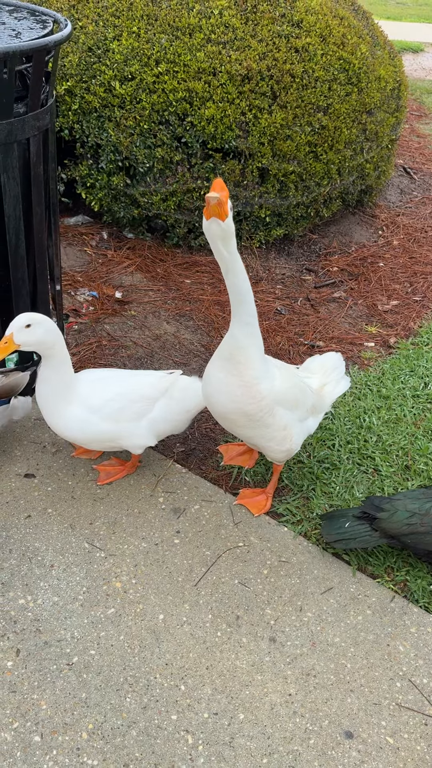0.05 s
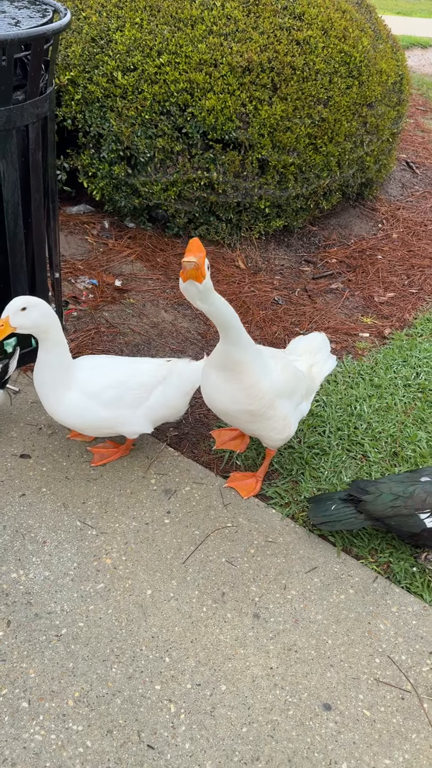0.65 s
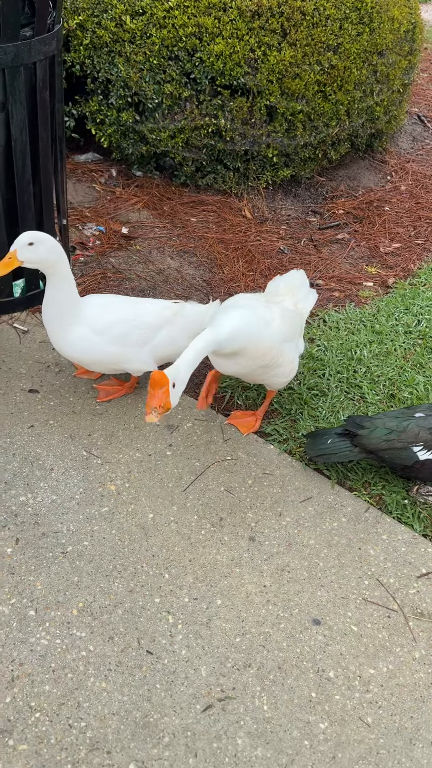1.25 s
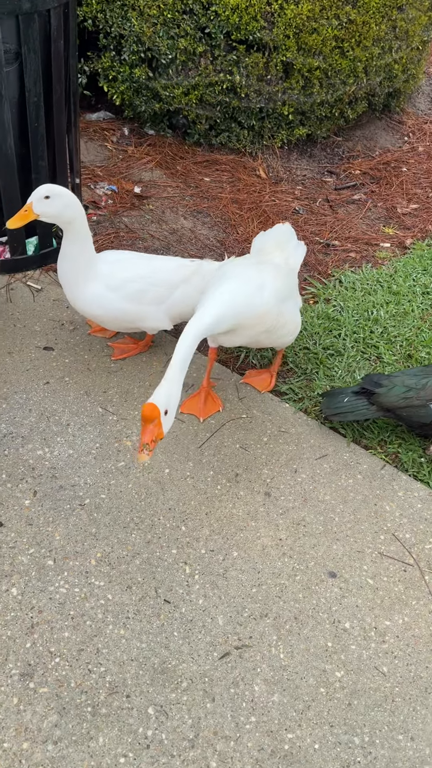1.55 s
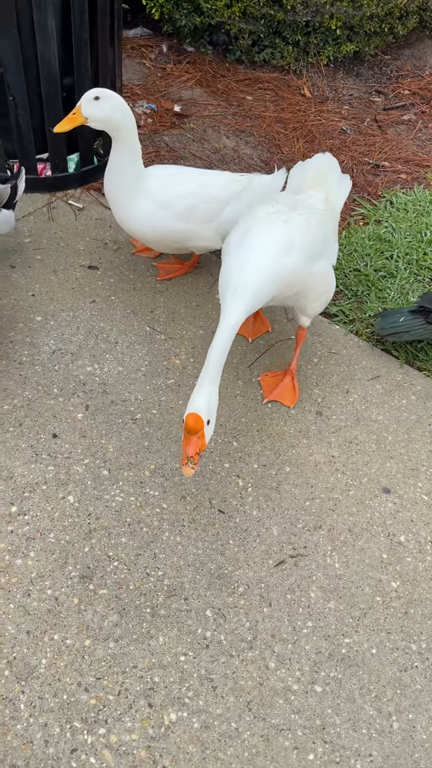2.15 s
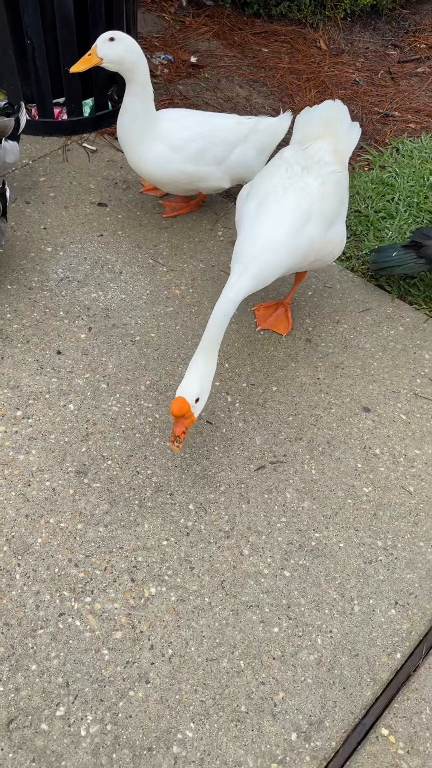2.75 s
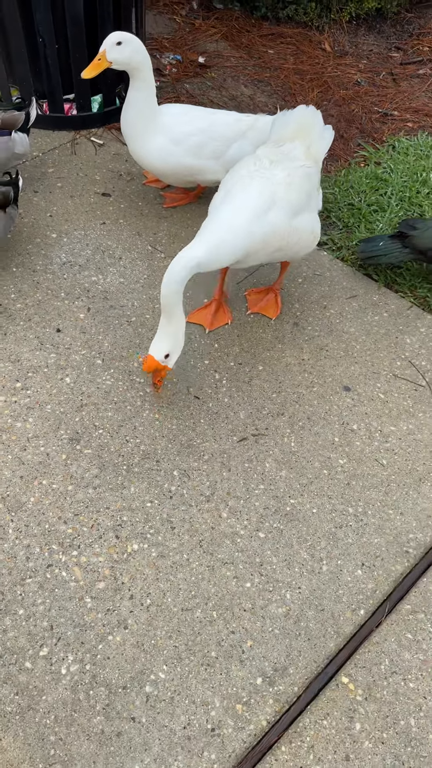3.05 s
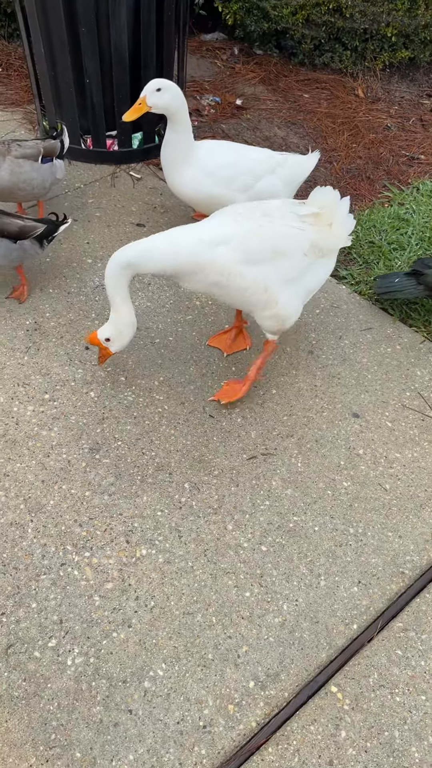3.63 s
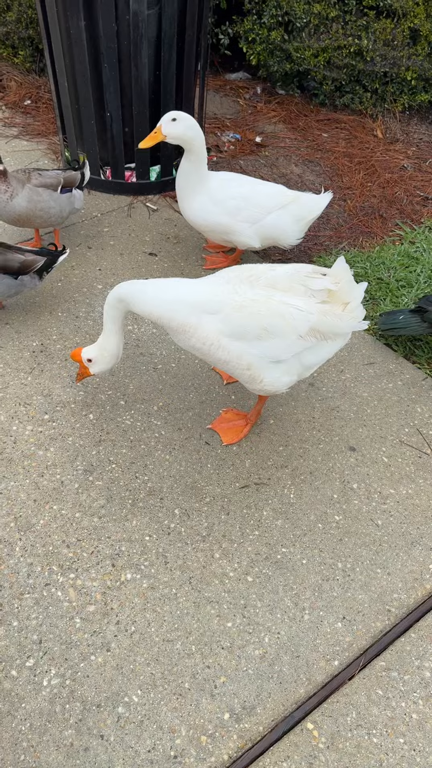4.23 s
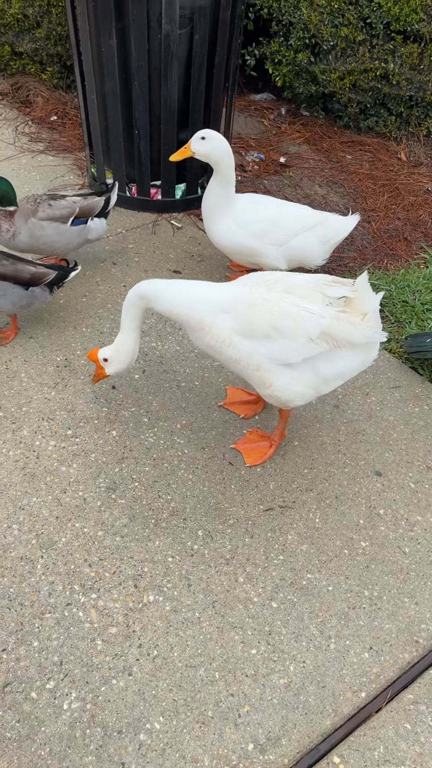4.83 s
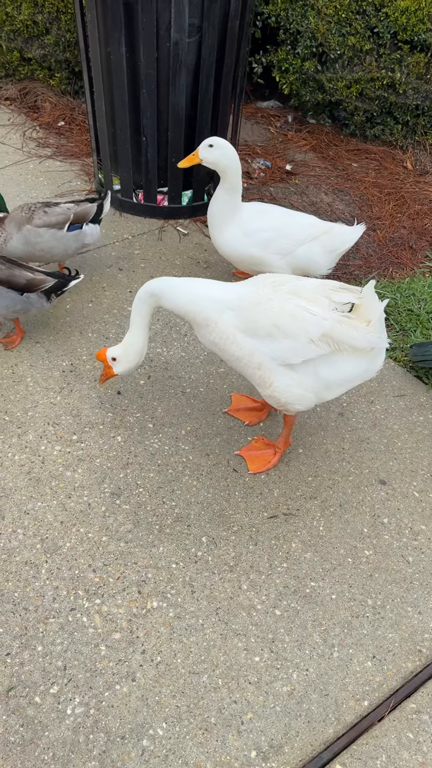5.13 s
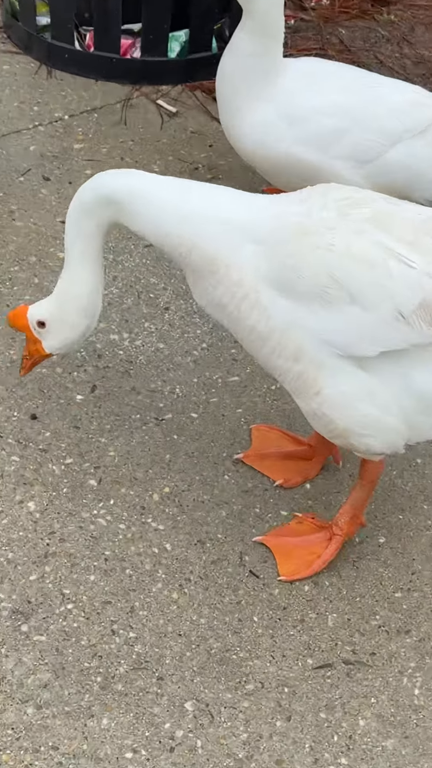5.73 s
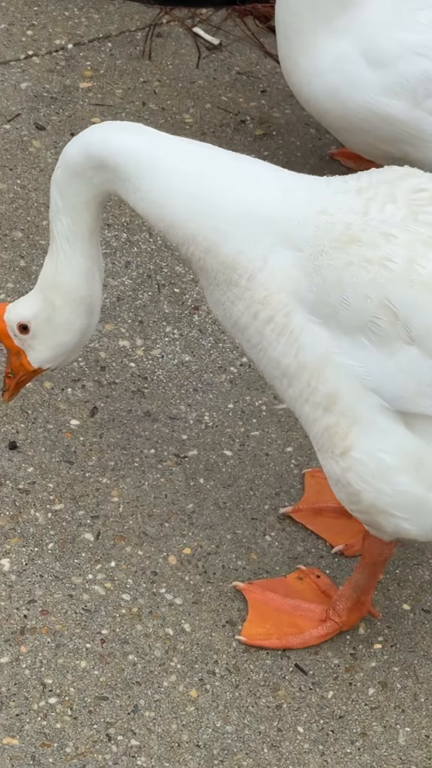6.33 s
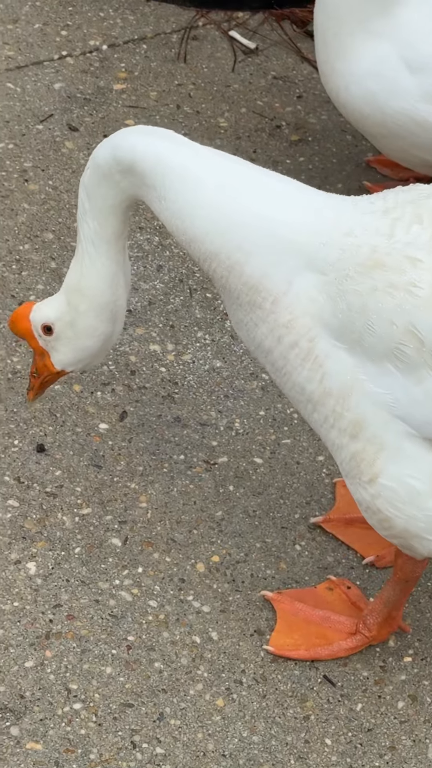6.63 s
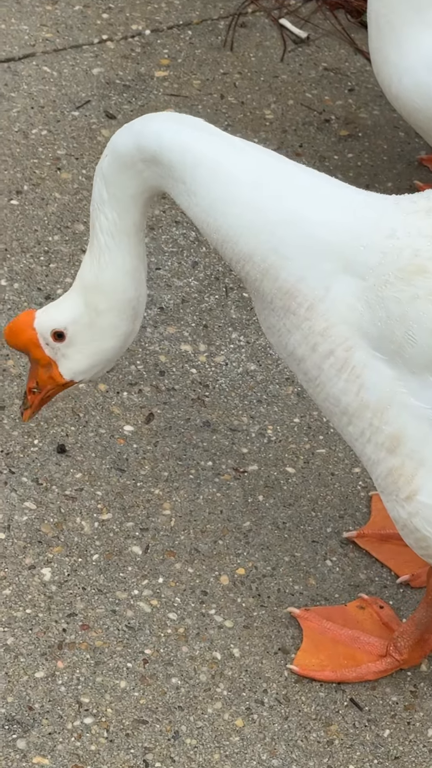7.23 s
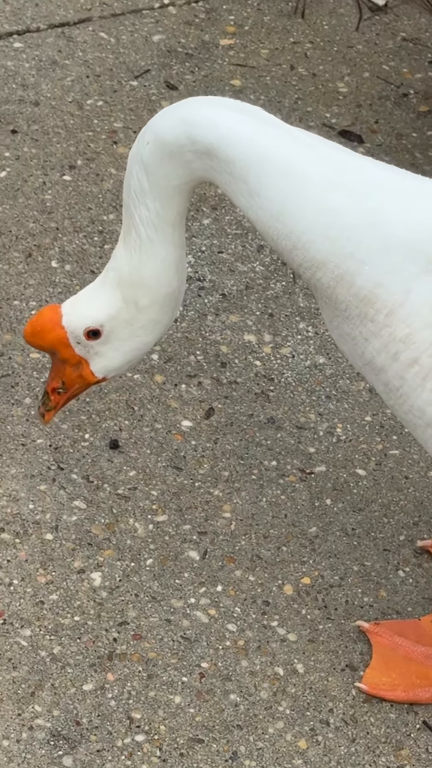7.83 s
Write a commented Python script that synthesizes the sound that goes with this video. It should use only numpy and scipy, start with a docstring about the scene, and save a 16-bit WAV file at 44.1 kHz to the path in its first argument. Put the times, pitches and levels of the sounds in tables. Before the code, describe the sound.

Close by, ducks give short, rattling clucks and soft quacks, about two a second, mostly a little to the left. A goose's bill ticks and scrapes lightly on concrete while gusts rumble and pop on the microphone. Later the calls thin out and the gusts ease. A low rumble swells near the end and a distant bird whistles once, over faint outdoor traffic and hiss.

```python
"""Ducks cluck close by, beside a goose feeding on a pavement.
Each cluck is a short rattle of slow pulses ringing through throat and bill, doubled by its echo off
the concrete. Bills scrape and tick on the ground, and wind rumbles and pops on the microphone.
Far traffic and a fine hiss lie behind; near the end a low drone swells and a distant bird whistles."""
import sys
import numpy as np
from scipy import signal
from scipy.fft import rfft, irfft
from scipy.io import wavfile

SR = 44100
rng = np.random.default_rng(int(sys.argv[2]) if len(sys.argv) > 2 else 0)


def persist_wave(psi):
    """Save psi, clipped to +-1, as 16-bit WAV."""
    counts = np.round(np.clip(psi, -1, 1) * 32767).astype(np.int16)
    wavfile.write(sys.argv[1], SR, np.atleast_2d(counts).T)


N = 355887
OPPOSED = np.array([[1], [-1]])  # flips the right channel's polarity, for width


def gain_of(db):
    """Decibels to amplitude."""
    return 10 ** (np.asarray(db) / 20)


def unit_rms(x):
    """Scales to rms 1."""
    return x / np.sqrt(np.mean(x ** 2) + 1e-20)


def curve_at(points, hz):
    """Reads a curve on a log-frequency axis."""
    f, value = np.transpose(points)
    return np.interp(np.log(hz + 1), np.log(f + 1), value)


def add(mix, s, sound):
    """Mixes a stereo sound in from time s."""
    start = round(s * SR)
    sound = sound[:, max(-start, 0):]
    part = mix[:, max(start, 0):][:, :sound.shape[1]]
    part += sound[:, :part.shape[1]]


def panned(x, left_db=0):
    """Places a sound by its left-minus-right level."""
    return gain_of([[left_db / 2], [-left_db / 2]]) * x


def noise(spectrum, size=N):
    """Noise of rms 1, coloured by an EQ curve."""
    eq = gain_of(curve_at(spectrum, np.fft.rfftfreq(size, 1 / SR)))
    return unit_rms(irfft(rfft(rng.standard_normal(size)) * eq, size))


def drift(cutoff_hz):
    """Smooth random modulation of rms 1."""
    lowpass = np.exp(-(np.fft.rfftfreq(N, 1 / SR) / cutoff_hz) ** 2)
    return unit_rms(irfft(rfft(rng.standard_normal(N)) * lowpass, N))


def arch(t, rise_s, fall_s, hold_s=0, steepness=2):
    """An envelope that swells to 1 at t = 0, holds, and falls away."""
    return np.exp(-(np.maximum(-t, 0) / rise_s + np.maximum(t - hold_s, 0) / fall_s) ** steepness)


def resonate(x, hz, width_hz):
    """A resonance that can sweep with hz, applied twice for steep skirts."""
    carrier = np.exp(2j * np.pi * np.cumsum(hz * np.ones(len(x))) / SR)
    r = np.exp(-np.pi * width_hz / SR)
    return 2 * (carrier * signal.lfilter([(1 - r) ** 2], [1, -2 * r, r * r], x / carrier + 1e-18)).real


def puffs(t, times, sizes, rise_s, decay_s):
    """Breath noise that swells up to each of the given times and dies away after it."""
    age = t[:, None] - times
    airflow = (sizes * np.exp(-abs(age) / np.where(age < 0, rise_s, decay_s))).sum(1)
    return airflow * rng.standard_normal(len(t))


# resonances of the bill: (frequency [Hz], width [Hz], gain [dB])
BILL_RESONANCES = [(3890, 840, 1.5), (4400, 390, 3), (5290, 460, 7), (5970, 510, 6)]


def bill_rasp(t, times, sizes, puff_s=.0043, spread=.97):
    """Puffs of air ring the bill: a bright, wide edge on the voice."""
    rushes = [puffs(t, times, sizes, puff_s, puff_s) for _ in range(2)]
    mid, side = [sum(gain_of(db) * resonate(rush, hz, width) for hz, width, db in BILL_RESONANCES)
                 for rush in rushes]
    return unit_rms(mid + spread * OPPOSED * side)


# the character of each kind of call
BREATHINESS = {"mutter": .75, "croak": .95, "quack": .65}  # breath against snaps [ratio]
FORMANT_WIDTH = {"mutter": .115, "croak": .1, "quack": .11}  # bandwidth [share of the formant's frequency]
CHIRP_S = {"mutter": 0.00058, "croak": 0.00191, "quack": 0.00368}  # how much later higher formants speak [s per octave]
RASP_DB = {"mutter": -23, "croak": -22, "quack": -14}  # bill rasp against the voice [dB]
LEFT_LAG_S = {"mutter": .00002, "croak": .00001, "quack": .00008}  # delay of the left channel [s]
# how far left the clucks sound, narrowing to the centre near the end: (time [s], left minus right [dB])
CLUCK_PAN = [(0, 12), (2.5, 18), (3.0, 4), (3.5, 13), (5.2, 18), (5.7, 2)]
# how much of that pan a formant takes: (frequency [Hz], share [0-1])
FORMANT_PAN = [(1300, 0.65), (1650, 0.54), (2000, 0.22), (2500, .11)]
# duck calls: (middle snap [s], level [dB], snap rate [Hz], swell [s], fade [s], kind,
# formants of throat and bill as (frequency [Hz], gain [dB]))
CLUCKS = [(0.009, -41, 65.9, 0.046, 0.018, "mutter", [(1680, -5), (1940, 0)]),
          (0.4225, -42.5, 66.2, .058, 0.049, "mutter", [(1310, -5), (1570, -2), (1930, 3)]),
          (0.706, -44.5, 87.3, .027, .05, "croak", [(1340, 5), (1730, 0), (2340, -12)]),
          (0.7554, -38.5, 72.4, 0.033, 0.04, "croak", [(1150, -2), (1350, -1.5), (1790, -3), (2220, -9)]),
          (0.9996, -41.5, 67.65, 0.089, .047, "mutter", [(1300, 2), (1680, 1), (1950, 1.5), (2470, -15)]),
          (1.321, -40, 73.1, 0.049, 0.064, "croak", [(1290, 3), (1780, 1.5), (2200, -2.5), (2860, -10)]),
          (1.741, -44, 65.5, 0.072, .061, "mutter", [(1270, -2), (1530, -2), (1920, 1)]),
          (2.1461, -38.5, 71.9, 0.044, .053, "mutter", [(1260, -4), (1530, -1), (1920, 4), (2500, -16)]),
          (2.3075, -47, 76.5, 0.056, 0.023, "quack", [(1430, 2), (1690, -3), (2300, -7)]),
          (2.5594, -35.5, 78, 0.047, .046, "quack", [(1320, 0), (1560, -0.5), (1980, -1.5), (2340, -8),
          (2900, -11.5)]), (2.976, -37.5, 79.6, .043, 0.046, "quack", [(1450, -12), (1750, 1.5), (2120, -1),
          (2680, -7)]), (3.3704, -35.5, 77.95, 0.043, 0.043, "quack", [(1410, -10), (1660, 0.5), (2030, -8),
          (2550, -10)]), (3.5376, -36.5, 77.9, 0.048, 0.064, "quack", [(1440, -0.5), (1670, 4.5),
          (1990, -3), (2430, 0)]), (3.827, -44, 84.4, .032, 0.044, "quack", [(1400, -16), (1700, 4),
          (2330, 0.5)]), (3.96, -38.5, 74.25, .058, .054, "quack", [(1420, -7), (1660, 2.5), (1970, 0.5),
          (2440, -2)]), (4.281, -35.5, 79.2, .058, .043, "quack", [(1430, -9), (1680, -1.5), (2010, -4),
          (2520, -4)]), (4.744, -42.5, 69, 0.044, 0.05, "croak", [(1080, -9), (1400, -4), (1780, 2),
          (2140, 2)]), (5.181, -40, 74.3, .048, 0.04, "croak", [(1010, -7), (1400, 0.5), (1740, -1),
          (2200, 2.5), (2830, -11.5)]), (5.593, -45.5, 71.5, 0.061, .05, "mutter", [(1660, 2), (1990, 1.5),
          (2580, -10)]), (6.3489, -47.5, 71.4, 0.064, 0.05, "mutter", [(1270, -3), (1660, 2), (1950, 0),
          (2500, -7)]), (7.447, -54, 66, 0.035, .036, "mutter", [(1450, 0), (1950, -1)])]


def cluck(s, db, rate, swell_s, fade_s, kind, formants):
    """The syrinx snaps a few times, fastest and hardest mid-call; each snap chirps up, with a puff."""
    t = np.arange(-SR // 9, SR // 9) / SR
    count = np.arange(-6, 7)
    snap_s = count / rate * (1 + .003 * count ** 2)  # slower towards both ends
    snap_s += .0008 * rng.standard_normal(len(count))
    opening = np.maximum(1 - abs(t / np.where(t < 0, swell_s, fade_s)) ** 1.25, 0)
    index = np.clip(np.searchsorted(t, snap_s), 0, len(t) - 1)
    sizes = opening[index]
    snaps = np.zeros(len(t))
    snaps[index] = sizes * gain_of(1.7 * rng.standard_normal(len(count)))
    breath = puffs(t, snap_s, sizes, rise_s=.003, decay_s=.005)
    drive = unit_rms(snaps) + BREATHINESS[kind] * unit_rms(breath)
    # soft tissue dulls the snaps, and a small bill radiates no bass
    drive = signal.sosfilt(signal.butter(3, (850, 3600), "band", fs=SR, output="sos"), drive)
    # the formants rise as the bill opens, and climb a little within every snap
    snap_phase = (np.interp(t, snap_s, count) + .3) % 1
    tuning = 1 + .08 * (opening - .85) + .06 * (snap_phase - .55)
    dulling_db_per_octave = 14 * (1 - opening)
    left_db = np.interp(s, *np.transpose(CLUCK_PAN))
    voice = np.zeros((2, len(t)))
    for hz, formant_db in formants:
        octaves = np.log2(hz / 1650)  # from the middle of the voice
        wobble = np.interp(t, snap_s, 1 + .022 * rng.standard_normal(len(count)))
        chirped = np.interp(t - CHIRP_S[kind] * octaves, t, drive)
        ring = resonate(chirped, hz * tuning * wobble, FORMANT_WIDTH[kind] * hz)
        ring *= gain_of(formant_db - dulling_db_per_octave * octaves)
        voice += panned(ring, curve_at(FORMANT_PAN, hz) * left_db)
    voice = unit_rms(voice) + gain_of(RASP_DB[kind]) * bill_rasp(t, snap_s, sizes)
    voice[0] = np.interp(t - LEFT_LAG_S[kind], t, voice[0])
    voice += pavement_echo(t, voice)
    core_rms = np.sqrt(np.mean(voice[:, abs(t) < .02] ** 2))
    return s + t[0], gain_of(db) * voice / core_rms


def pavement_echo(t, voice, delay_s=.002243, gain=.36):
    """The concrete returns the call a moment later, at a slightly different delay in each channel."""
    delays = delay_s * rng.uniform(.875, 1.143, 2)
    return gain * np.array([np.interp(t - delay, t, channel) for channel, delay in zip(voice, delays)])


# reverb decay of the yard: (frequency [Hz], t60 [s])
YARD_DECAY = [(500, 0.26), (2000, 0.11), (8000, 0.01)]


def yard_reverb(x):
    """A short, thin scatter from a bin, a hedge and the ground."""
    hz, t, bands = signal.stft(rng.standard_normal((2, SR // 3)), SR, nperseg=256)
    decay = gain_of(-60 * t / curve_at(YARD_DECAY, hz)[:, None])
    tail = signal.istft(bands * decay, SR, nperseg=256)[1]
    return signal.fftconvolve(x.mean(0)[None], tail / np.linalg.norm(tail[0]), axes=1)[:, :N]


# EQ of the outdoor bed, mid and side: (frequency [Hz], gain [dB])
AIR_MID_EQ = [(100, 8.5), (250, 1.5), (500, 5), (900, 5), (1300, -1), (2000, -8), (2900, -11.5),
              (3800, -11), (4700, -15.5), (6000, -14), (7500, -18.5), (10000, -21.5), (12000, -61.5),
              (15500, -24.5)]
AIR_SIDE_EQ = [(88, -31), (150, -44), (431, -11), (888, -5), (1760, -23), (2870, -17.5), (3620, -32.5),
               (4950, -26), (5910, -28.5), (8730, -25.5), (10600, -17), (16000, -31.5)]


def outdoor_air(mid_db=-48.5, side_db=-54):
    """A steady bed of far traffic and fine hiss."""
    return gain_of(mid_db) * noise(AIR_MID_EQ) + OPPOSED * gain_of(side_db) * noise(AIR_SIDE_EQ)


# accents of the hiss, a loop of four beats: (strength [0-1])
HISS_ACCENTS = [0.56, 0.1, 0.59, 0.87]
# EQ of its side signal: (frequency [Hz], gain [dB])
HISS_SIDE_EQ = [(3000, -30), (5800, -18), (7000, 1), (8500, 8), (10400, -1), (12500, -26), (15500, -6)]


def fluttering_hiss(db=-61, beats_per_s=23.91, rise_s=.0078):
    """Faint, wide puffs of high hiss on a quick, even pulse."""
    beats = np.arange(N) / SR * beats_per_s - .5
    age = (beats % 1) / beats_per_s / rise_s
    accent = np.array(HISS_ACCENTS)[np.floor(beats).astype(int) % len(HISS_ACCENTS)]
    mid = unit_rms(resonate(rng.standard_normal(N), hz=7150, width_hz=1400))
    hiss = 1.07 * mid + OPPOSED * noise(HISS_SIDE_EQ)
    return gain_of(db) * accent * age * np.exp(1 - age) * hiss


# EQ of the wind's two layers: (frequency [Hz], gain [dB])
RUMBLE_EQ = [(13, -49.5), (22, -58), (49, -4.5), (70, -0.5), (125, -5), (260, -16.5), (340, -29),
             (570, -120)]
FLUTTER_EQ = [(110, -8.5), (200, -4), (300, -5.5), (420, -14), (600, -21), (900, -56), (1600, -100)]
# gusts: (time [s], hold [s], rumble level [dB], flutter against rumble [dB]), before the trims
GUSTS = [(0.04, .12, -37, -27), (0.789, 0.14, -31, -12), (1.286, 0.042, -33.5, -10),
         (1.372, 0.36, -30, -7.5), (1.81, 0.61, -32, -9), (2.461, 0.56, -31.5, -5), (3.094, 0.16, -33, -8),
         (3.375, 0.56, -34.5, -11), (4.01, 0.27, -46.5, -22), (4.511, 0.27, -36, -10),
         (4.857, .1, -36.5, -11.5), (5.018, 0.21, -35, -14), (5.272, 0.12, -36.5, -12),
         (5.482, 0.16, -42, -22), (5.792, 0.22, -35, -26)]


def wind(rumble_trim_db=-1, flutter_trim_db=-3, rumble_lumps_db=2, flutter_lumps_db=4):
    """Lumpy turbulence on the microphone: a deep rumble, and a flutter above it in the gusts."""
    t = np.arange(N) / SR
    rumble_level, flutter_level = gain_of(-45.5), gain_of(-51)  # the breeze between gusts
    for start, hold_s, db, flutter_db in GUSTS:  # gusts add to it in power
        gust = gain_of(db) * arch(t - start, rise_s=.035, fall_s=.0094, hold_s=hold_s, steepness=2.1)
        rumble_level = np.hypot(rumble_level, gust)
        flutter_level = np.hypot(flutter_level, gain_of(flutter_db) * gust)
    # small eddies differ more between left and right than large ones
    rumble = noise(RUMBLE_EQ) + .12 * OPPOSED * noise(RUMBLE_EQ)
    flutter = noise(FLUTTER_EQ) + .37 * OPPOSED * noise(FLUTTER_EQ)
    rumble *= rumble_level * unit_rms(gain_of(rumble_lumps_db * drift(32.4)))
    flutter *= flutter_level * unit_rms(gain_of(flutter_lumps_db * drift(31)))
    return gain_of(rumble_trim_db) * rumble + gain_of(flutter_trim_db) * flutter


# EQ of a bill on concrete: (frequency [Hz], gain [dB])
PECK_EQ = [(500, 3), (1300, 7), (2500, 12), (4200, 9), (5800, 12), (7500, 3), (10000, 1), (15000, -77)]
# pecks and scuffs: (time [s], level before trim [dB], t60 [s])
PECKS = [(0.6696, -42, 0.041), (0.705, -41.5, 0.055), (0.9564, -41.5, 0.1), (1.491, -42.5, 0.039),
         (2.1015, -36.5, 0.025), (2.262, -41.5, 0.036), (2.587, -37.5, 0.1), (3.3233, -42, 0.05),
         (3.47, -33.5, 0.072), (3.482, -37, 0.064), (3.596, -44, 0.34)]


def peck(s, db, t60, trim_db=-8, attack_s=.000057, spread=.7):
    """A hard bill grates briefly on the concrete."""
    t = np.arange(SR // 8) / SR
    mid, side = noise(PECK_EQ, len(t)), noise(PECK_EQ, len(t))
    stroke = (1 - np.exp(-t / attack_s)) * gain_of(db + trim_db - 60 * t / t60)
    return s, stroke * (mid + spread * OPPOSED * side)


# the catch in a duck's voice: (time [s], level [dB], pitch [Hz])
SQUEAK = (0.7545, -28, 1800)


def squeak(s, db, hz, rise_s=.004, fall_s=.0068):
    """Mid-call the voice catches, and one resonance rings out nearly pure."""
    t = np.arange(SR // 25) / SR
    envelope = gain_of(db) * arch(t - rise_s, rise_s / 2, fall_s)
    return s, panned(envelope * np.sin(2 * np.pi * hz * t), left_db=4.5)


# single eddies: (time [s], level before trim [dB], settling pitch [Hz])
WIND_POPS = [(0.904, -14.5, 446), (1.07, -31.5, 111), (1.274, -25, 234), (1.563, -18.5, 75.5),
             (1.696, -18.5, 184), (1.706, -21.5, 72), (1.825, -18.5, 320), (1.875, -20.5, 100),
             (1.962, -17, 189), (2.143, -17, 92), (2.149, -21.5, 258), (2.197, -18, 110), (2.257, -23, 293),
             (2.504, -23.5, 350), (2.699, -26.5, 333), (2.787, -25, 296), (2.861, -20, 134),
             (2.899, -20.5, 175), (2.984, -25, 75), (3.198, -24.5, 242), (3.424, -20, 247),
             (3.596, -27.5, 570), (3.739, -23.5, 175), (3.871, -23, 189), (4.51, -32, 217),
             (4.837, -26.5, 189), (4.873, -30, 301), (5.052, -24, 290), (5.062, -17, 120),
             (5.095, -25.5, 277), (5.123, -25.5, 258), (5.276, -32.5, 295), (5.347, -28.5, 255),
             (5.925, -27.5, 192), (5.985, -22.5, 88.5)]


def wind_pop(s, db, hz, rise_cycles=.72, sag=.48, push_db=-5, push_ratio=.503, trim_db=-2):
    """An eddy hits the microphone: a few quick swings of pressure on a slower, deeper push."""
    t = np.arange(SR // 7) / SR
    age = t * hz / rise_cycles
    turns = hz * t * (1 + sag * np.exp(-age / 2))
    swings = age * np.exp(1 - age) * np.sin(2 * np.pi * turns)
    slow_age = push_ratio * age
    push = gain_of(push_db) * slow_age * np.exp(1 - slow_age) * np.sin(2 * np.pi * push_ratio * turns)
    # the microphone passes no deep bass
    thump = signal.sosfilt(signal.butter(2, 45, "high", fs=SR, output="sos"), swings + push)
    return s, panned(gain_of(db + trim_db) * thump)


# EQ of grit: (frequency [Hz], gain [dB])
GRIT_EQ = [(1500, -27), (5000, -5), (10000, 15), (15000, -21)]
# tiny sharp ticks: (time [s], level before trim [dB])
GRIT_TICKS = [(2.1022, -52), (2.556, -56), (2.972, -54), (4.457, -54), (6.294, -51), (6.335, -53)]


def grit_tick(s, db, t60=.02, trim_db=-3):
    """A grain of grit clicks on the concrete."""
    t = np.arange(SR // 16) / SR
    return s, panned(gain_of(db + trim_db - 60 * t / t60) * noise(GRIT_EQ, len(t)))


def drone(db=-39, full_at_s=6.95, swell_s=.57):
    """An even, distant rumble, as dark as the wind, swells in late and stays."""
    swell = arch(np.arange(N) / SR - full_at_s, swell_s, swell_s, hold_s=np.inf)
    return panned(gain_of(db) * swell * noise(RUMBLE_EQ))


# a far bird: (peak time [s], level [dB], swell [s], fade [s], melody as (time [s], pitch [Hz]))
WHISTLES = [(7.065, -44, 0.077, 0.059, [(6.931, 862), (6.97, 1039), (7.01, 1060), (7.055, 997),
            (7.087, 850), (7.14, 866)])]


def bird_whistle(peak_s, db, swell_s, fade_s, melody, warble=.065):
    """One wavering whistle from across the park, swelling and fading."""
    times, pitches = np.transpose(melody)
    t = np.arange(times[0], times[-1], 1 / SR)
    hz = np.interp(t, times, pitches) * (1 + warble * drift(145)[:len(t)])
    envelope = gain_of(db) * arch(t - peak_s, swell_s, fade_s, steepness=1.8)
    return times[0], panned(envelope * np.sin(2 * np.pi * np.cumsum(hz) / SR))


def scene(reverb_db=-13):
    """The birds get a touch of yard reverb; wind and background stay dry."""
    birds, pops = np.zeros((2, N)), np.zeros((2, N))
    for row in CLUCKS:
        add(birds, *cluck(*row))
    add(birds, *squeak(*SQUEAK))
    for row in PECKS:
        add(birds, *peck(*row))
    for row in GRIT_TICKS:
        add(birds, *grit_tick(*row))
    for row in WHISTLES:
        add(birds, *bird_whistle(*row))
    for row in WIND_POPS:
        add(pops, *wind_pop(*row))
    reverb = gain_of(reverb_db) * yard_reverb(birds)
    return birds + reverb + pops + wind() + drone() + outdoor_air() + fluttering_hiss()


def record(dry, cutoff_hz=15900):
    """A steep low-pass takes the very top off the mix."""
    lowpass = signal.firwin(511, cutoff_hz, window=("kaiser", 9), fs=SR)
    return signal.oaconvolve(dry, lowpass[None], "same")


dry = scene()
out = record(dry)
persist_wave(out)
```